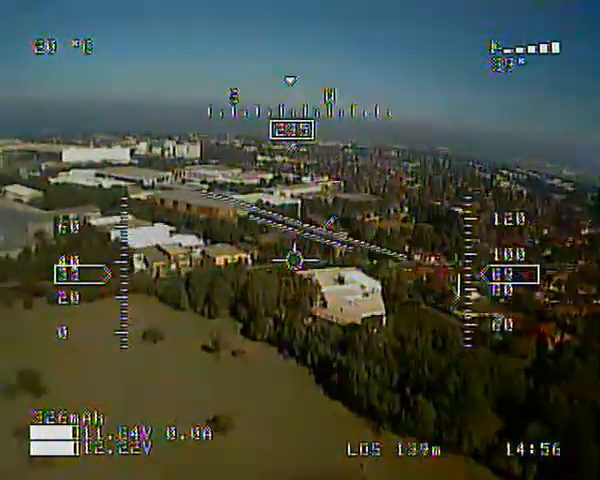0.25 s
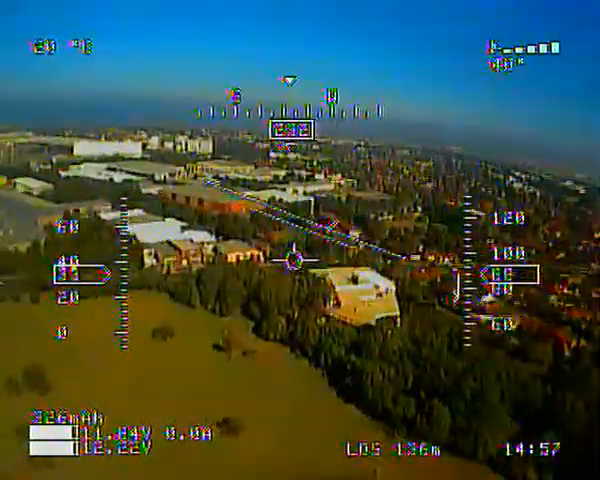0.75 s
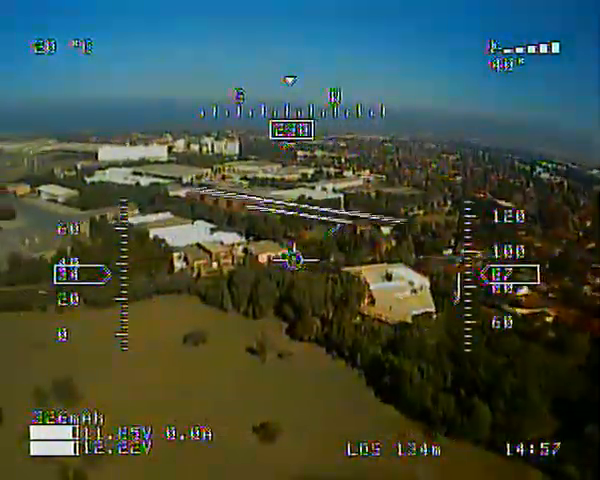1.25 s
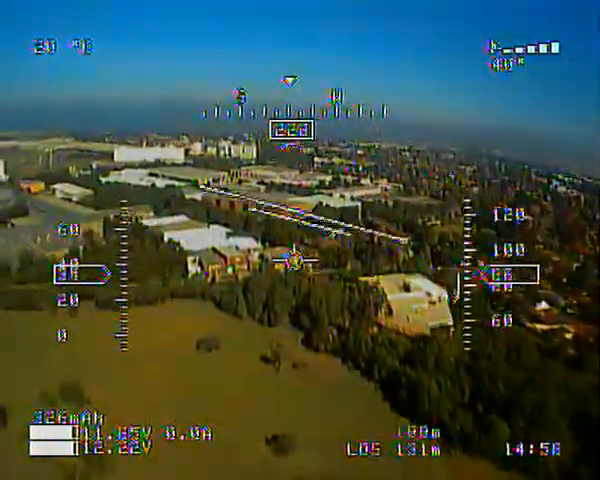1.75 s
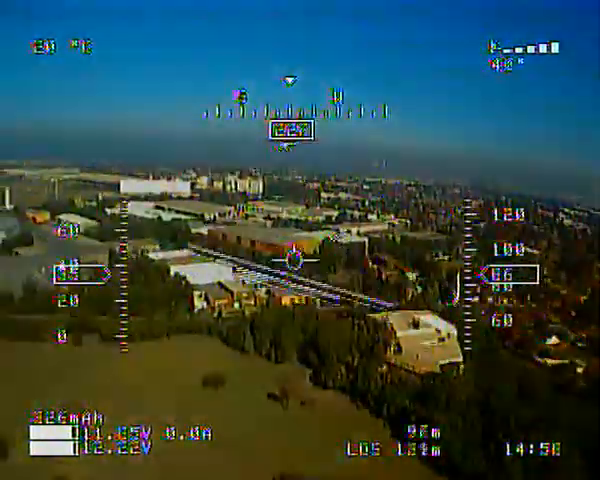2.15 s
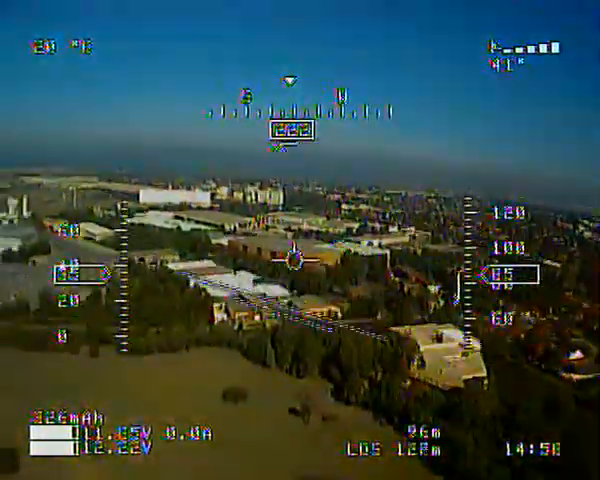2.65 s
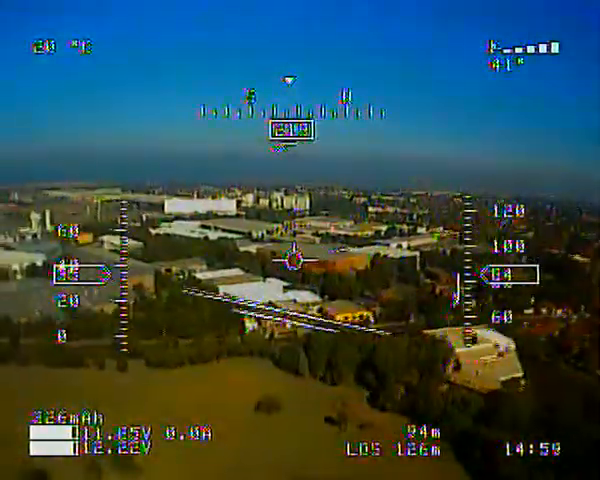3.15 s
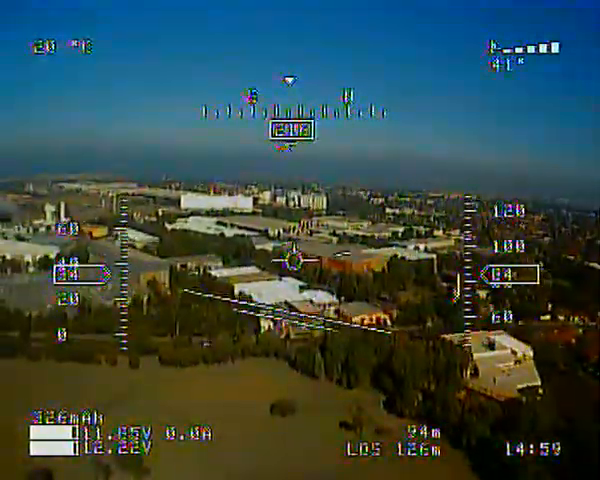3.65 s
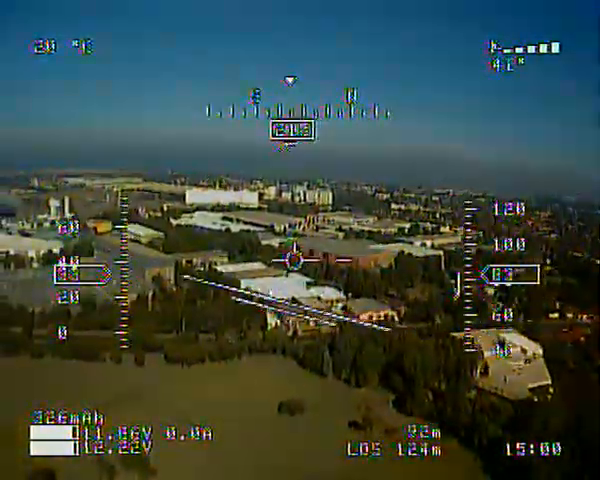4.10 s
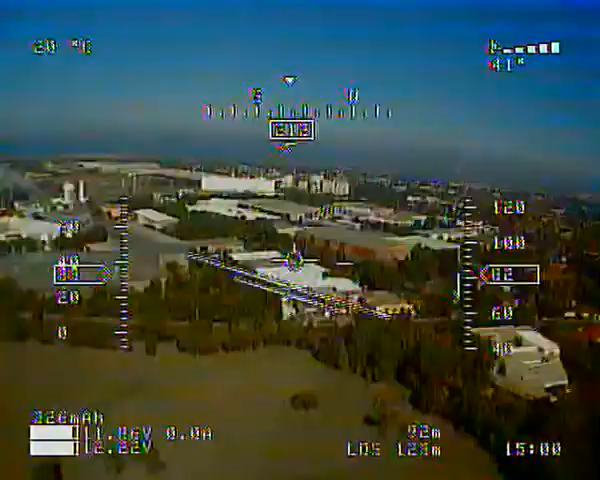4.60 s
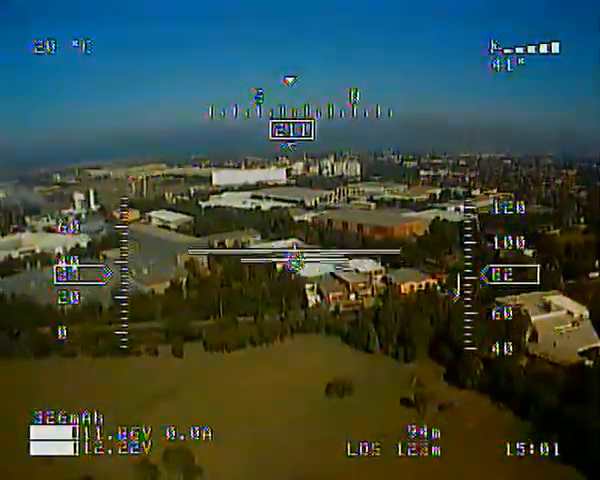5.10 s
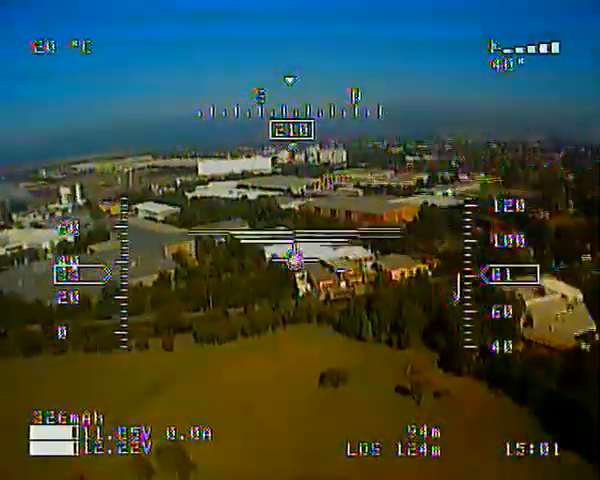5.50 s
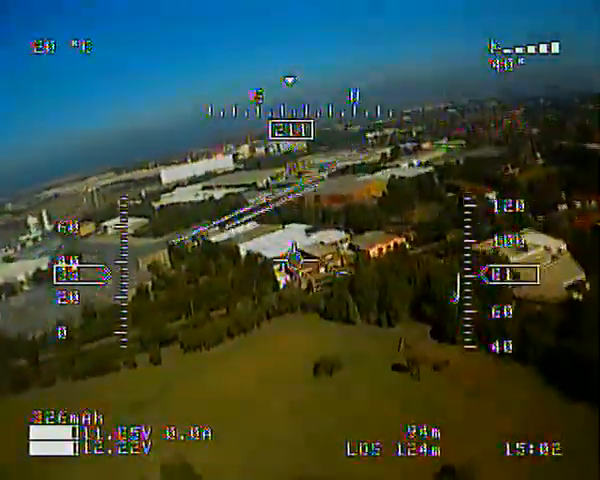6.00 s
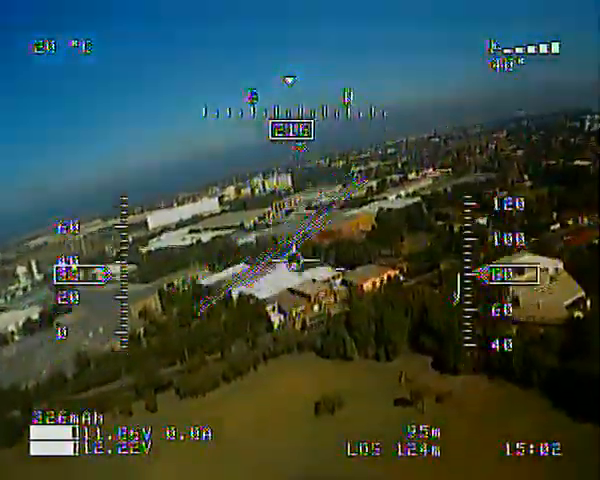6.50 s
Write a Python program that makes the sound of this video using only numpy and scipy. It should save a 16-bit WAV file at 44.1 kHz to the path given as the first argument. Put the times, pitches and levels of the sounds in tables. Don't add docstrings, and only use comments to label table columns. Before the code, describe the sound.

Airflow rushes and slaps over an unshielded microphone in flight, overdriven and muffled in the right channel, with only faint hiss on the left.

```python
import sys
import numpy as np
from scipy import signal
from scipy.fft import rfft, irfft, dct
from scipy.io import wavfile
from scipy.ndimage import uniform_filter1d

SR = 44100
rng = np.random.default_rng(int(sys.argv[2]) if len(sys.argv) > 2 else 0)


def makeup_ratio(level_db):
    decades = np.asarray(level_db, float) / 20
    return 10 ** decades


def to_wav(s):
    ch = np.atleast_2d(s).T
    pcm = np.round(np.clip(ch, -1, 1) * 32767)
    wavfile.write(sys.argv[1], SR, pcm.astype(np.int16))


N = 298116


def along(table, hz, column=1):
    rows = np.array(table, float)
    return np.interp(np.log(np.maximum(hz, 1)), np.log(rows[:, 0]), rows[:, column])


def unit(x):
    return x / np.sqrt(np.mean(x ** 2))


def walk(rate):
    hold = int(SR / rate)
    steps = np.repeat(rng.standard_normal(N // hold + 1), hold)
    return unit(uniform_filter1d(uniform_filter1d(steps, hold), hold)[:N])


def hiss(colour, db):
    hz = np.fft.rfftfreq(N, 1 / SR)
    spectrum = rfft(rng.standard_normal(N)) * makeup_ratio(along(colour, hz))
    return unit(irfft(spectrum, N)) * makeup_ratio(db)


# [Hz, dB per Hz]
OPEN_HISS = [(20, -8), (800, 0.5), (5000, -6), (7000, -13.5), (12000, -31)]


def open_input():
    return hiss(OPEN_HISS, db=-71)


# [Hz, dB per Hz]
LINK_HISS = [(20, -26), (1000, -6.5), (5300, -1), (6200, 2.5), (6800, -6), (7300, -7.5), (7700, -16),
             (9500, -33.5)]


def link_hiss(wind):
    load = np.sqrt(uniform_filter1d(wind ** 2, size=SR // 3))
    return hiss(LINK_HISS, db=-40) * unit(load ** 0.47)


# [s, dB]
FLOW = [(0, -22.5), (.36, -20.5), (.47, -23.5), (.95, -23.2), (1.3, -19.5), (1.6, -22.2), (1.85, -21.2),
        (2.25, -22.2), (2.7, -25.5), (3.45, -22.8), (4.2, -26.5), (4.7, -22.2), (5.4, -22.8), (5.78, -26.5),
        (6.1, -23.2), (6.3, -22.8), (6.4, -26.2), (6.76, -26.2)]
# [s, dB]
PUFFS = [(.2, 1.5), (.75, 2.2), (1.2, 1.5), (1.8, 2.2), (2.2, 2.5), (2.6, 1.5), (2.9, 2.2), (3.5, 1.5),
         (3.72, 1.5), (3.9, 1.5), (4.3, 2.5), (4.5, 2.2), (5.1, 2.5), (5.42, 3.2), (5.6, 2.5), (5.96, 1.5),
         (6.52, 1.5)]
# [s, dB]
BUFFET = [(0, .1), (.6, .3), (1.15, 2.5), (2, .6), (3, 1.5), (4, -1.2), (4.25, .4), (4.8, -2.5),
          (5.4, -2.2), (6, .8), (6.76, -2.5)]


def gust_levels():
    t = np.arange(N) / SR
    times, rush_db = np.transpose(FLOW)
    gust = np.interp(t, times, rush_db - rush_db.mean())
    puff_s = .045
    puffs = sum(db * np.exp(-((t - at) / puff_s) ** 2) for at, db in PUFFS)

    def follow(gust_share, puff_share, wander_db):
        return gust_share * gust + puff_share * puffs + wander_db * walk(9)

    low = follow(.15, .1, wander_db=.9) + np.interp(t, *np.transpose(BUFFET))
    rush = follow(1.01, .9, wander_db=.4)
    high = follow(.95, 1.1, wander_db=.6)
    return [low, rush, high]


def passing_eddies():
    eddies = walk(50) + 1.4 * walk(150) + 2.4 * walk(500)
    return unit(eddies - uniform_filter1d(eddies, size=SR // 13))


# [Hz, dB per Hz]
WIND = [(15, -40), (30, -26), (50, -14.5), (80, -6), (140, -2), (290, 1), (570, 0), (1060, -4.5),
        (2000, -14), (3500, -22), (5000, -25.5), (6000, -24)]


def turbulence(hz):
    slaps_per_s, link_top_hz = 250, 5143
    strikes = rng.random(N) < slaps_per_s / SR
    slaps = strikes * makeup_ratio(14.0 + 2.8 * rng.exponential(size=N)) * rng.choice([-1, 1], N)
    noise = rfft(rng.standard_normal(N)) + rfft(slaps) * hz / (hz + 400)
    return noise * makeup_ratio(along(WIND, hz)) / np.sqrt(1 + (hz / link_top_hz) ** 36)


# [Hz, dB, dB]
EDDIES = [(60.9, 1.58, 0.3), (246, 0.5, 1), (635, 2.3, .6), (1993, 2.2, .8), (5235, 2.5, 1.35)]


def airflow():
    hz = np.fft.rfftfreq(N, 1 / SR)
    gusts = gust_levels()
    body_eddies, treble_eddies = passing_eddies(), passing_eddies()
    spectrum = turbulence(hz)
    roar = 0
    for k in range(-1, 17):
        centre = 25 * 2 ** (k / 2)
        octaves = np.log2(np.maximum(hz, 1) / centre)
        band = np.cos(np.pi / 2 * np.clip(2 * octaves, -1, 1)) ** 2
        place = np.interp(np.log(centre), np.log((150, 720, 3000)), [0, 1, 2])
        gust_db = sum(max(0, 1 - abs(place - j)) * gust for j, gust in enumerate(gusts))
        turn = .6 * max(0, np.log2(centre / 600))
        eddies = np.cos(turn) * body_eddies + np.sin(turn) * treble_eddies
        shared_db = along(EDDIES, centre) * eddies
        own_db = along(EDDIES, centre, column=2) * walk(90)
        shake = unit(makeup_ratio(shared_db + own_db))
        roar = roar + makeup_ratio(gust_db) * shake * irfft(spectrum * band, N)
    return unit(roar) * makeup_ratio(-14.0)


def preamp(wind):
    clip_up, clip_down, knee = .545, .655, 8.
    top = np.where(wind > 0, clip_up, clip_down)
    clipped = wind / (1 + np.abs(wind / top) ** knee) ** (1 / knee)
    return signal.sosfilt(signal.butter(1, 12, "high", fs=SR, output="sos"), clipped)


def scene():
    wind = preamp(airflow())
    right = wind + link_hiss(wind)
    return np.array([open_input(), right])


def to_lines(blocks):
    a, b, c, d = np.split(blocks, 4, axis=-1)
    return dct(np.concatenate([-c[..., ::-1] - d, a - b[..., ::-1]], -1), 4, norm="ortho")


def to_blocks(lines):
    low, high = np.split(dct(lines, 4, norm="ortho"), 2, axis=-1)
    return np.concatenate([high, -high[..., ::-1], -low[..., ::-1], -low], -1)


def add_strays(whole, unlike):
    count = len(unlike)
    low_hz = 7580
    top_hz = np.linspace(8000, 9600, count)
    share = np.linspace(.08, .5, count)
    luck, height = rng.random((count, 2)).T
    stray_hz = low_hz + height ** 2 * (top_hz - low_hz)
    block = np.flatnonzero(luck < share)
    hop = whole.shape[-1]
    place = block, (stray_hz[block] * 2 * hop / SR).astype(int)
    whole[0][place], whole[1][place] = 1, unlike[block] - 1.


# [Hz, dB]
STEP = [(50, -26.5), (800, -24), (2500, -25.5), (5400, -31.5), (7000, -33), (8000, -32.5), (9500, -37.5)]
UNLIKE = [.23, .37, .42, .51, .74, .93, 1.86, 2.65, 2.97, 3.02, 3.34, 3.44, 3.62, 3.67, 3.9, 4.55, 4.69,
          5.2, 5.25, 5.43, 5.53, 6.41, 6.5, 6.64, 6.78]


def recorder_rounding(x):
    hop, start = 2048, 110
    count = N // hop + 2
    window = np.sin(np.pi * (np.arange(2 * hop) + .5) / (2 * hop))
    pair = np.array([x[0] + x[1], x[0] - x[1]]) / 2
    pair = np.pad(pair, ((0, 0), (hop - start, 3 * hop)))
    index = np.arange(count)[:, None] * hop + np.arange(2 * hop)
    lines = to_lines(pair[:, index] * window)
    loud = np.sqrt(np.mean(lines[0] ** 2, -1, keepdims=True)) + 1e-9
    line_hz = (np.arange(hop) + .5) * SR / 2 / hop
    step = makeup_ratio(along(STEP, line_hz)) * (loud / loud.mean()) ** 0.74
    steps = np.array([step, step])
    unlike = np.isin(np.arange(count), np.round(np.multiply(UNLIKE, SR / hop)))
    steps[1, unlike] *= makeup_ratio(1.0)
    whole = np.round(lines / steps)
    add_strays(whole, unlike)
    blocks = to_blocks(whole * steps) * window
    first = np.pad(blocks[..., :hop], ((0, 0), (0, 1), (0, 0)))
    second = np.pad(blocks[..., hop:], ((0, 0), (1, 0), (0, 0)))
    mid, side = (first + second).reshape(2, -1)[:, hop - start:][:, :N]
    return np.array([mid + side, mid - side])


def roll_off(x):
    return signal.sosfilt(signal.butter(12, 9600, fs=SR, output="sos"), x)


def record(dry):
    offsets = np.array([[.0029], [.0154]])
    mix = recorder_rounding(dry) + offsets
    return roll_off(mix)


dry = scene()
out = record(dry)
to_wav(out)
```